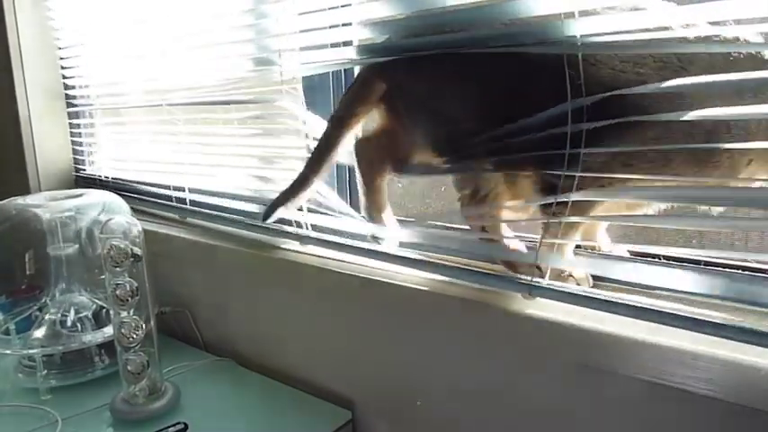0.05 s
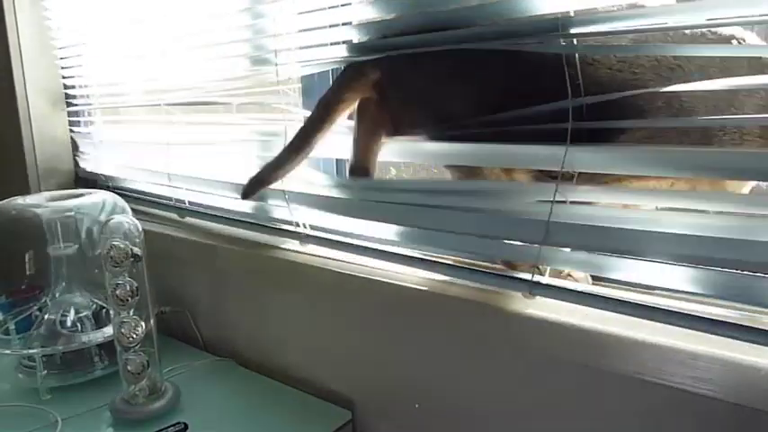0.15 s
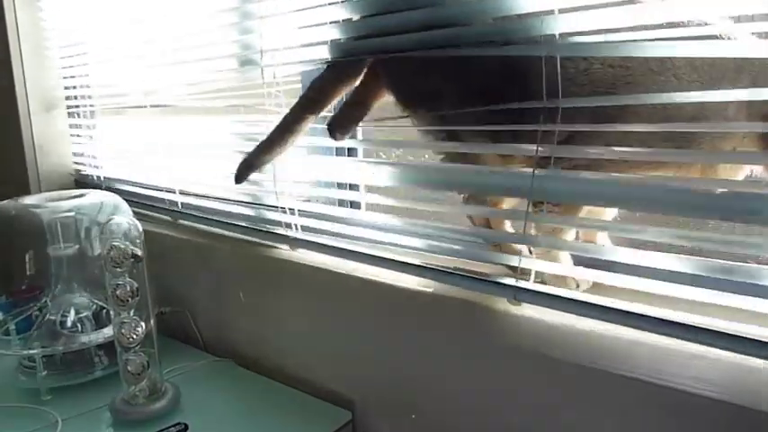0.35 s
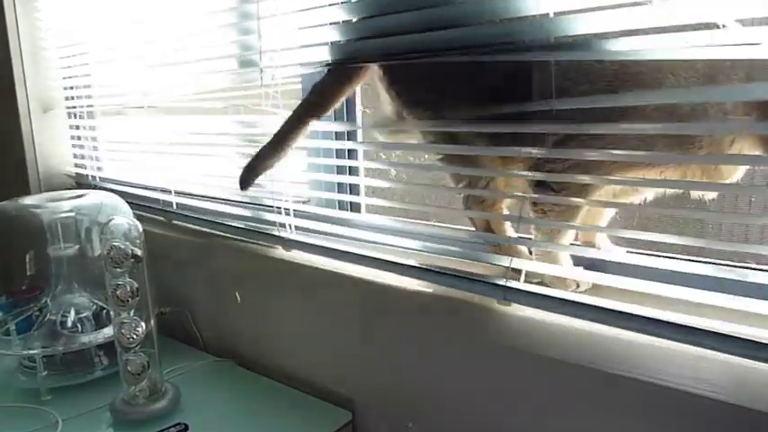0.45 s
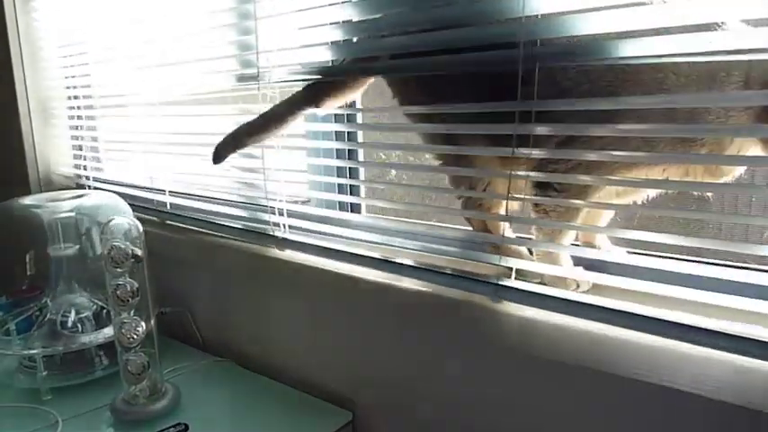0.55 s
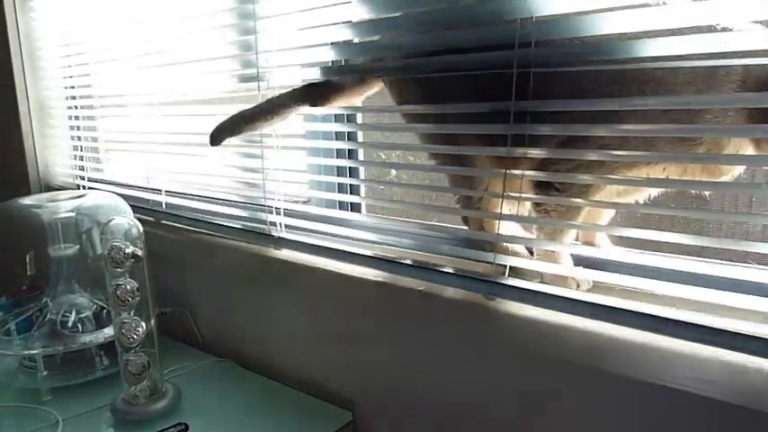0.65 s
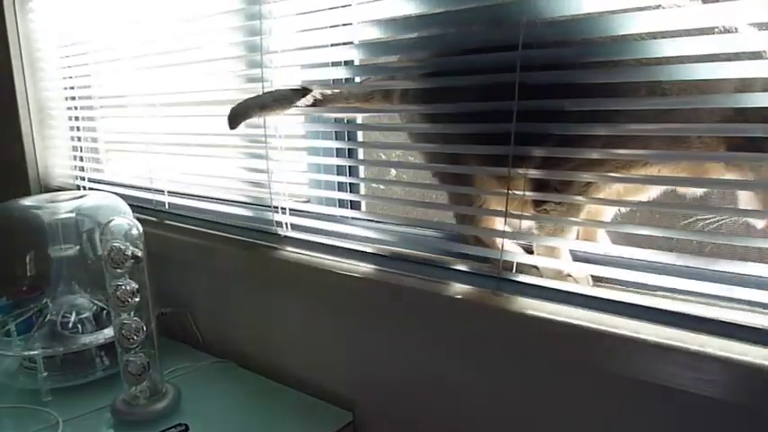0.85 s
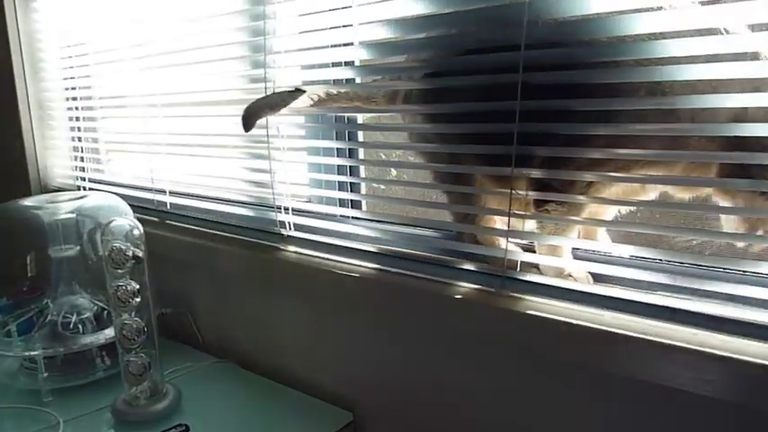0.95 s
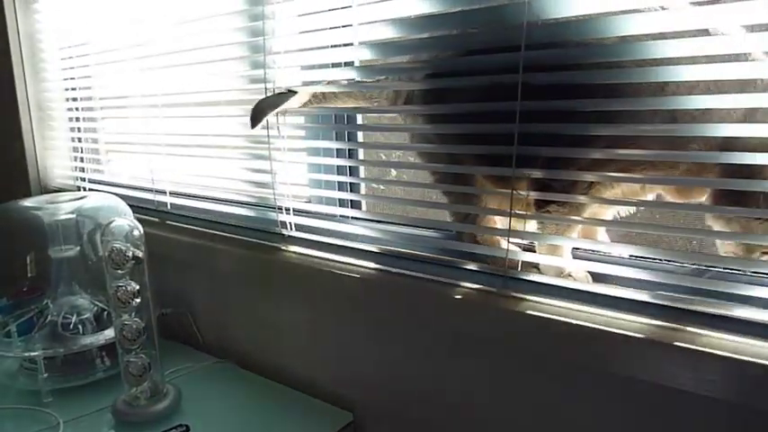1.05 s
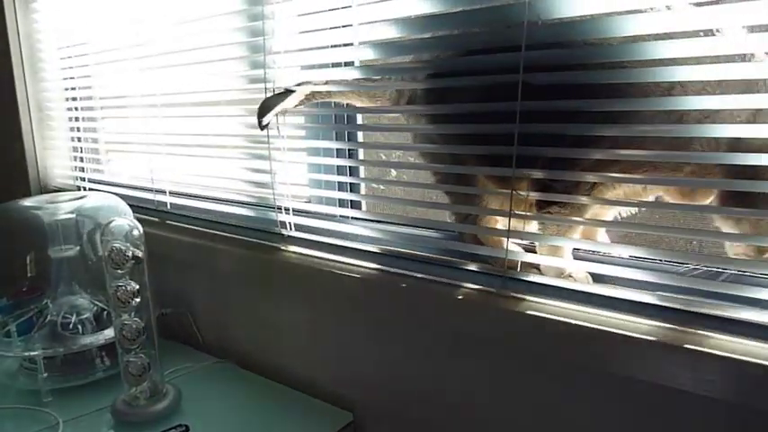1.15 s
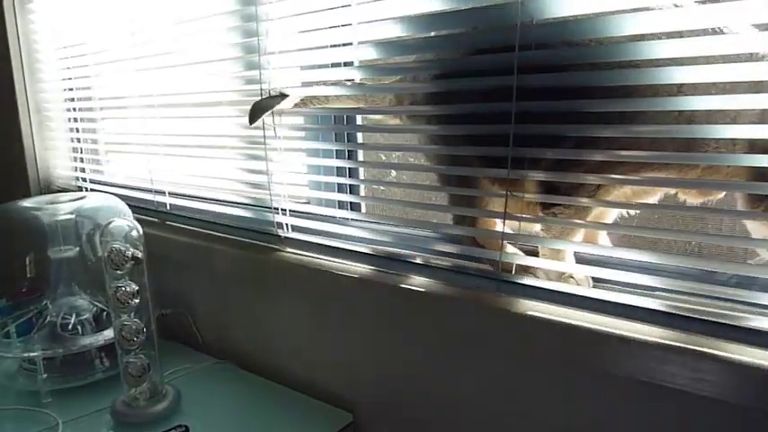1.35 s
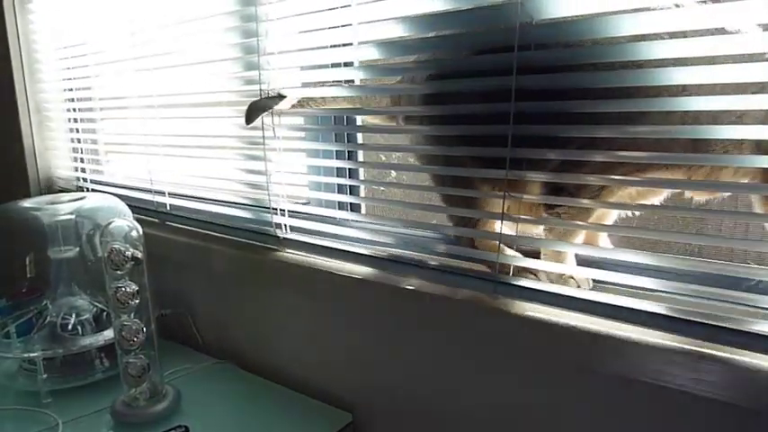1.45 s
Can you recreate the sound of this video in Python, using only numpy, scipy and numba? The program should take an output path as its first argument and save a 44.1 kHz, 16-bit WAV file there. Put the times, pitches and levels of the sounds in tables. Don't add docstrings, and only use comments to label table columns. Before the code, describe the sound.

Thin metal window blinds clatter and rattle as a cat pushes through, then settle into quiet room hum

```python
import sys
import numpy as np
from scipy import signal
from scipy.fft import rfft, irfft
from scipy.io import wavfile
from numba import njit

SR = 44100
rng = np.random.default_rng(int(sys.argv[2]) if len(sys.argv) > 2 else 0)


def invert_db(level):
    return 10 ** (np.asarray(level, dtype=float) / 20)


def digitize_waveform(pressure):
    field = np.atleast_2d(pressure).T
    bounded = np.clip(field, -1, 1)
    quanta = np.round(bounded * 32767).astype(np.int16)
    wavfile.write(sys.argv[1], SR, quanta)


N = 66150

# f/Hz, level per Hz/dB
HUM_SPECTRUM = [(25, -5.5), (60, -1), (120, -6), (200, -0.5), (400, -3), (900, -2), (1600, -14.5),
                (2500, -24.5), (8800, -31)]
# f/Hz, level/dB
HUM_WIDTH = [(40, -21), (100, -13), (500, -16.5), (1000, -13), (2000, 2.5), (5000, 5)]
# t/s, level/dB
GROAN_LEVEL = [
    (0, -65),
    (.07, -57),
    (.3, -51),
    (.53, -54.5),
    (.6, -66),
    (.75, -65),
    (.87, -57),
    (.95, -69),
    (1.5, -71.5),
]
# f/Hz, level per Hz/dB
GROAN_SPECTRUM = [(80, -21), (150, 0.5), (270, 1), (420, -18.5)]
# t/s, chatter level/dB, f/Hz, t60/s, first blow over chatter/dB
RAIL_KNOCKS = [(.059, -47.5, 800, 0.46, 15.5), (.227, -38, 1150, 0.089, 18), (0.261, -35, 1060, .7, 15),
               (.41, -45, 876, .15, 16), (.435, -44, 750, 0.52, 4.5), (0.536, -47, 1110, .1, 25),
               (.644, -39, 786, .6, 2), (0.643, -45, 1046, 0.09, 26), (.709, -38.5, 748, 0.44, 5),
               (0.9, -52.5, 540, .25, 9), (.683, -53, 750, .15, 9.5), (0.99, -49.5, 790, .3, 6),
               (.855, -34.5, 815, 0.45, 13.5), (.878, -43.5, 740, 0.4, 23), (0.83, -59.5, 650, 0.55, 32.5),
               (1.390, -44.5, 756, 0.49, 2), (0.74, -45, 2900, .5, -5), (.814, -41, 1025, .2, 10.5),
               (.849, -42, 1896, .5, 7), (.873, -40.5, 1880, 0.27, 8), (.533, -50.5, 880, .1, 26.5),
               (0.29, -43, 1140, 0.22, 15.5), (.266, -46, 810, .15, 14.5), (0.34, -45.5, 820, 0.14, 6),
               (0.88, -51.5, 570, .12, 14.5), (.03, -41, 1400, 1.6, -2)]
RAIL_HZ = [400, 495, 575, 727, 844, 1040]
# t/s, level/dB, f/Hz, t60/s
SLAT_SNAPS = [(0.045, -30, 3370, 0.02), (0.055, -25, 3190, 0.01), (0.1004, -23, 4060, 0.021),
              (0.1, -28, 6880, 0.011), (0.1015, -42.5, 4050, .01), (.1313, -16.5, 3470, 0.0059),
              (0.139, -24.5, 1730, 0.013), (.176, -33.5, 3300, .01), (0.257, -24, 1532, 0.021),
              (.2665, -26, 1850, .012), (0.503, -23, 3130, .015), (.5155, -18, 4560, .012),
              (0.519, -14, 6450, .012), (.5235, -19, 6900, .01), (.523, -22, 4950, .01),
              (.5075, -20, 4850, .01), (.5405, -18, 5600, .008), (.2255, -24, 4030, .01),
              (.2545, -20, 3680, .01), (.4205, -28, 4410, .01), (.6565, -26, 3990, .01),
              (.167, -34, 1600, .012), (.551, -22, 4450, .012), (0.5385, -15, 7000, 0.01),
              (1.016, -48, 3600, .011), (1.059, -47, 7100, .009), (1.123, -39, 4550, .015),
              (1.119, -40, 1500, .013), (1.058, -52, 3300, 0.009), (1.392, -48, 1450, 0.008)]
# t/s, level/dB, f/Hz, t60/s
SLAT_PINGS = [(.037, -33, 2690, 0.045), (.298, -28, 4000, 0.035), (.713, -46, 4000, .1),
              (.821, -45, 2550, .04), (.866, -44, 3250, .05), (.558, -29, 4480, .04),
              (.549, -26, 4430, 0.04), (.66, -38, 4000, 0.06), (.762, -50, 3410, 0.15),
              (.229, -19, 815, .06), (.856, -25, 740, .1), (.856, -31, 1200, .06), (.876, -26, 728, 0.2),
              (.913, -30, 710, .1), (.857, -28, 397, 0.14), (1.04, -61, 4380, 0.17),
              (1.392, -61, 3230, .16), (1.418, -54, 1580, 0.3), (1.393, -39, 380, 0.12),
              (1.394, -44, 900, .07), (1.438, -45, 550, .08)]
# t/s, level/dB, f/Hz, t60/s
BENT_SLAT_NUDGES = [(.2545, -18, 1540, .075), (.2665, -21, 1547, .1), (.293, -30, 1562, .05),
                    (.304, -28, 1575, .16), (.325, -33, 1585, .08), (.364, -27, 1601, .06),
                    (.412, -30, 1590, .1), (.432, -29, 1600, .11), (.460, -27, 1588, .13),
                    (.4985, -20, 1618, .08), (.524, -25, 1611, .12), (.5345, -16, 1609, .07),
                    (.561, -23, 1591, .11), (.589, -25, 1591, .09), (.616, -32, 1600, .08),
                    (.657, -29, 1580, .05), (.676, -34, 1622, .07), (.699, -33, 1613, .16),
                    (.758, -37, 1615, .2), (.805, -44, 1610, .1), (.851, -36, 1600, .12),
                    (.912, -41, 1615, .1), (.945, -41, 1622, .2), (1.007, -47, 1601, .11),
                    (1.047, -50, 1596, .24)]
# t/s, level/dB, rise/s, t60/s, mode ring/dB
CAT_SHOVES = [(0, -52, 0.0014, .5, -17), (0.015, -44, 0.004, 1.5, -0.5), (0.039, -44, 0.0091, 0.28, -12),
              (0.148, -42.5, 0.022, 2.4, 0), (0.224, -27, 0.0014, 0.16, -3),
              (0.252, -26, 0.0028, 0.73, 1.5), (.295, -51, .005, .5, 1.5), (0.412, -32, 0.014, 0.82, 10.5),
              (0.495, -21, 0.014, 0.5, 6), (.537, -27, 0.003, 0.4, 0), (0.653, -29.5, 0.0027, 0.3, 2),
              (.71, -45, 0.0019, 0.52, -20), (0.816, -44.5, 0.0097, 0.21, -11), (.85, -43, 0.0069, 0.36, 4),
              (1.017, -53.5, 0.0016, 0.31, -20.5), (1.058, -55, .002, 0.12, 0),
              (1.117, -48, 0.004, 0.2, -12), (1.390, -57, .002, 0.16, -10)]
# f/Hz, level per Hz/dB
TICK_SPECTRUM = [(1250, -11), (1600, -4.5), (2200, -7), (3200, -3), (4430, 0), (5400, -2), (7000, -1.5),
                 (8800, -1)]
MODE_HZ = [1555, 1612, 1612, 2954, 4000, 4434, 4560, 5156, 5720, 6300, 6840, 8000]
# level/dB, t60/s
MODE_RINGS = [(-25.5, 0.1), (-20, 0.18), (-20, 0.2), (-13, 0.087), (-14, 0.03), (-14, 0.06), (-9, 0.09),
              (-31.5, 0.11), (-11.5, 0.056), (-7, 0.037), (-18, 0.054), (-24.5, 0.05)]
# f/Hz, level/dB
CAMERA_TOP = [(7450, 0), (7700, -7), (7900, -20), (8000, -10), (8120, -24), (8300, -15), (8780, -17),
              (8960, -30), (9200, -90)]

CONTACT_CYCLES = 0.74
LAG_S, LAG_SPREAD_S = 2.2e-5, 5e-5
MODE_JITTER = 0.0015


def table_db(hz, table):
    rows = np.array(table)
    return np.interp(np.log(np.maximum(hz, 1)), np.log(rows[:, 0]), rows[:, 1])


def colour(x, table):
    hz = np.arange(N // 2 + 1) * SR / N
    return irfft(rfft(x) * invert_db(table_db(hz, table)), N)


def unit(x):
    return x / np.sqrt(np.mean(x ** 2))


@njit
def grains(at, hz, t60, size, lag, contact):
    out = np.zeros((2, N))
    for k in range(len(at)):
        step = np.exp(2j * np.pi * hz[k] / SR - np.log(1000) / (t60[k] * SR))
        z = size[k] + 0j
        turn = np.pi * hz[k] * lag[k]
        c, s = np.cos(turn), np.sin(turn)
        closed = 1.0
        fade = np.exp(-hz[k] / (contact * SR))
        for i in range(int(at[k] * SR), min(N, int((at[k] + 0.7 * t60[k]) * SR))):
            out[0, i] += (c * z.imag - s * z.real) * (1 - closed) ** 2
            out[1, i] += (c * z.imag + s * z.real) * (1 - closed) ** 2
            z *= step
            closed = closed * fade + 1e-18
    return out


def ports(place):
    return LAG_S + LAG_SPREAD_S * place


def hum():
    level_db, pan_db = -52.5, -0.5
    mid, side = (colour(v, HUM_SPECTRUM) for v in rng.standard_normal((2, N)))
    both = mid + colour(side, HUM_WIDTH) * np.array([[1], [-1]])
    return invert_db(level_db + pan_db * np.array([[0.5], [-0.5]])) * unit(both)


def room(x):
    t60_s, level_db = 0.3, -7.5
    t = np.arange(N) / SR
    mid, side = rng.standard_normal((2, N)) * invert_db(-60 * t / t60_s) * (t > 0.003)
    side = signal.sosfilt(signal.butter(2, 3000, "high", fs=SR, output="sos"), side)
    tail = np.array([mid + side, mid - side]) / np.sqrt(np.sum(mid ** 2))
    return invert_db(level_db) * signal.fftconvolve(x.mean(0)[None], tail)[:, :N]


def groan():
    t, db = np.array(GROAN_LEVEL).T
    rumble = unit(colour(rng.standard_normal(N), GROAN_SPECTRUM))
    return rumble * invert_db(np.interp(np.arange(N) / SR, t, db))


def rail():
    blow_cycles, chatter_cycles = 17, 17.36
    chatters, spread, scatter_db, tilt_db = 400, 0.596, 1.8, -1
    ring_db, ring_t60_s = -17, 0.07
    start, db, pitch_hz, t60, blow = np.array(RAIL_KNOCKS).T.copy()
    out = grains(start, pitch_hz, blow_cycles / pitch_hz, invert_db(db + blow), ports(0 * db), CONTACT_CYCLES)
    for start, db, pitch_hz, t60, blow in RAIL_KNOCKS:
        when, luck, pick = rng.random((chatters, 3)).T
        detune, place = rng.standard_normal((chatters, 2)).T.clip(-2, 2)
        dt = when ** 1.3 * 0.6 * t60
        hz = pitch_hz * np.exp(spread * detune * np.where(detune < 0, 0.55, 1))
        size = invert_db(db - 60 * dt / t60 - scatter_db * np.log(luck))
        out = out + grains(start + dt, hz, chatter_cycles / hz, size * invert_db(tilt_db * abs(detune)),
                           ports(0.5 * place), CONTACT_CYCLES)
        mode = (pick * len(RAIL_HZ)).astype(int)
        hz = np.array(RAIL_HZ)[mode] * (1 + 3 * MODE_JITTER * detune)
        out = out + grains(start + dt, hz, ring_t60_s + 0 * hz, 0.72 * size * invert_db(ring_db),
                           ports(0 * hz), CONTACT_CYCLES)
    return out


def snaps():
    parts, spread, longest_s = 3, 0.08, 0.018
    at, db, hz, t60 = np.repeat(np.array(SLAT_SNAPS), parts, axis=0).T.copy()
    away = np.tile(np.linspace(-1, 1, parts), len(SLAT_SNAPS))
    late = 0.0008 * rng.random(len(at))
    return grains(at + late, hz * (1 + spread * away), np.minimum(t60, longest_s),
                  invert_db(db - 1.5 - 4.1 * abs(away)), ports(0.61 * away), CONTACT_CYCLES)


def pings():
    at, db, hz, t60 = np.array(SLAT_PINGS).T.copy()
    return grains(at, hz, t60, invert_db(db), ports(0.2 + 0 * at), 3 * CONTACT_CYCLES)


def nudges():
    at, db, hz, t60 = np.array(BENT_SLAT_NUDGES).T.copy()
    return grains(at, hz, t60, invert_db(db), ports(0.25 + 0 * at), 4.66)


def shove(at, start, db, rise, t60):
    dt = np.maximum(at - start, 0)
    fade = invert_db(-60 * np.maximum(dt - rise, 0) / t60)
    return invert_db(db) * np.minimum(dt / rise, 1) * fade


def slats():
    ticks, tick_cycles, scatter_db, ring_db = 14000, 13.74, 2.0, 2
    when, pitch, luck = rng.random((ticks, 3)).T
    place = rng.standard_normal(ticks)
    at = when * N / SR
    hz = 1250 * (8800 / 1250) ** pitch
    size = invert_db(-scatter_db * np.log(luck))
    stir = np.sqrt(sum(shove(at, *row[:4]) ** 2 for row in CAT_SHOVES))
    ring = np.sqrt(sum(shove(at, *row[:4]) ** 2 * invert_db(2 * row[4]) for row in CAT_SHOVES))
    tick_size = 1.12 * size * stir * invert_db(table_db(hz, TICK_SPECTRUM)) * np.sqrt(hz / 3000)
    out = grains(at, hz, tick_cycles / hz, tick_size, ports(place), CONTACT_CYCLES)
    mode = rng.integers(len(MODE_HZ), size=ticks)
    db, t60 = np.array(MODE_RINGS)[mode].T.copy()
    mode_hz = np.array(MODE_HZ)[mode] * (1 + MODE_JITTER * place)
    mode_size = size * ring * invert_db(db + ring_db) * 0.089
    return out + grains(at, mode_hz, t60, mode_size, ports(0.5 * place), CONTACT_CYCLES)


def scene():
    thin = signal.butter(3, 328, "high", fs=SR, output="sos")
    blind = signal.sosfilt(thin, rail() + snaps() + pings() + nudges() + slats())
    return hum() + groan() + room(blind) + blind


def low_pass(x):
    return signal.sosfilt(signal.butter(12, 8960, fs=SR, output="sos"), x)


def record(dry):
    notch_hz, width_hz = 5430, 260
    x = signal.lfilter(*signal.iirnotch(notch_hz, notch_hz / width_hz, fs=SR), dry)
    fade_out = np.minimum(np.arange(N, 0, -1) / 200, 1)
    mix = colour(x * fade_out, CAMERA_TOP)
    return low_pass(mix)


dry = scene()
out = record(dry)
digitize_waveform(out)
```